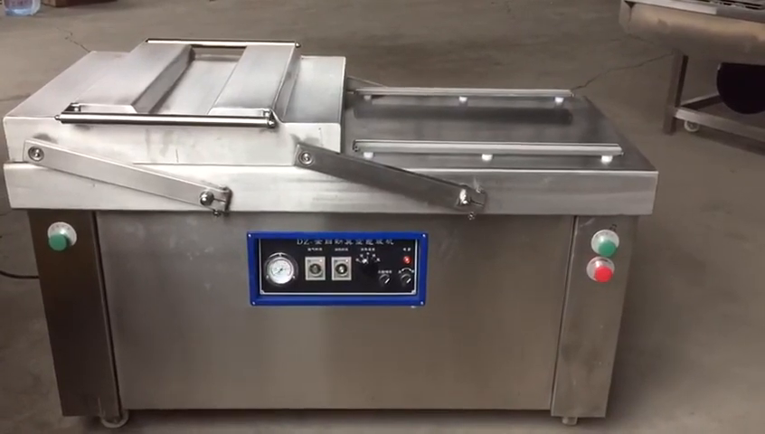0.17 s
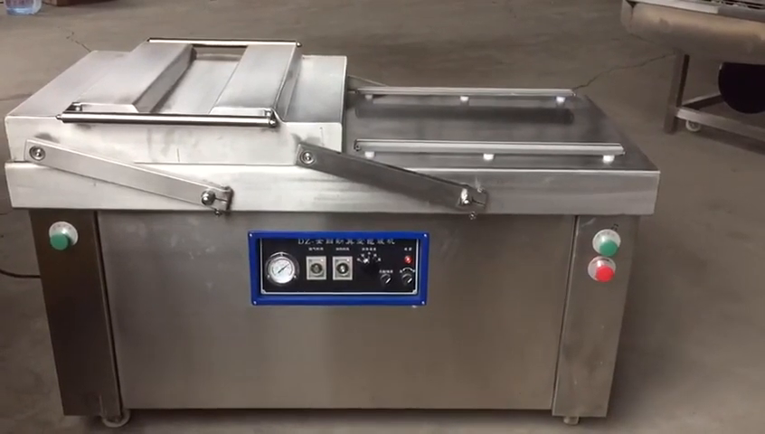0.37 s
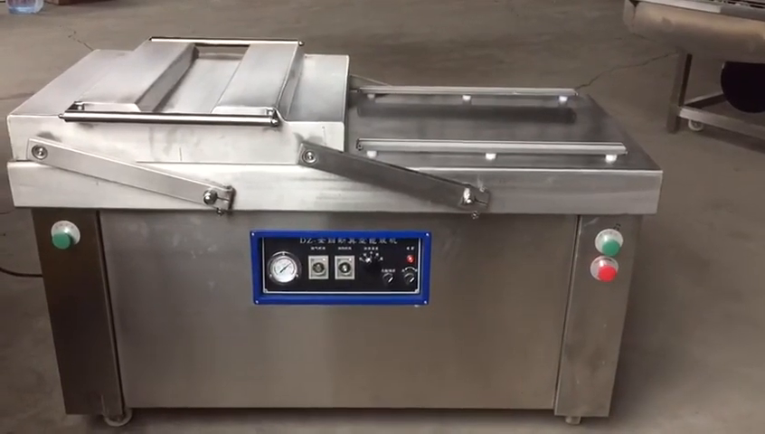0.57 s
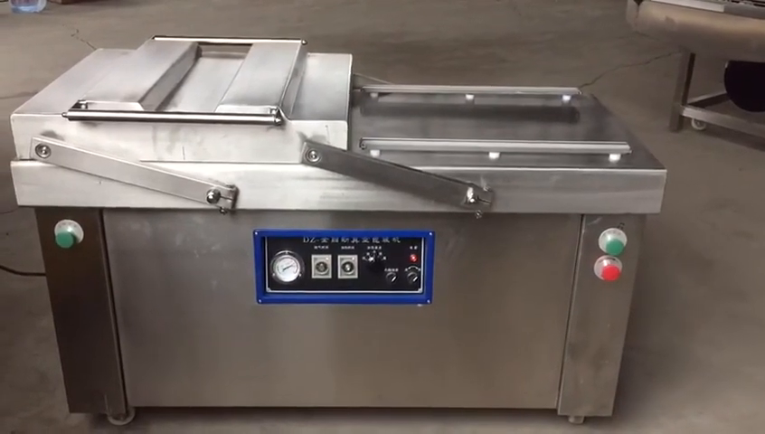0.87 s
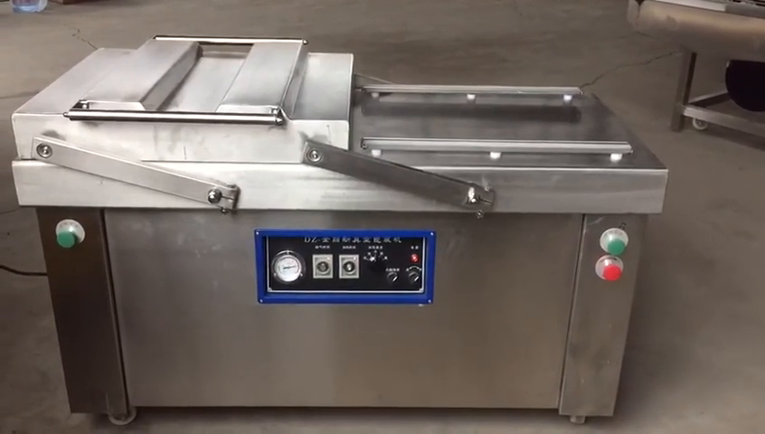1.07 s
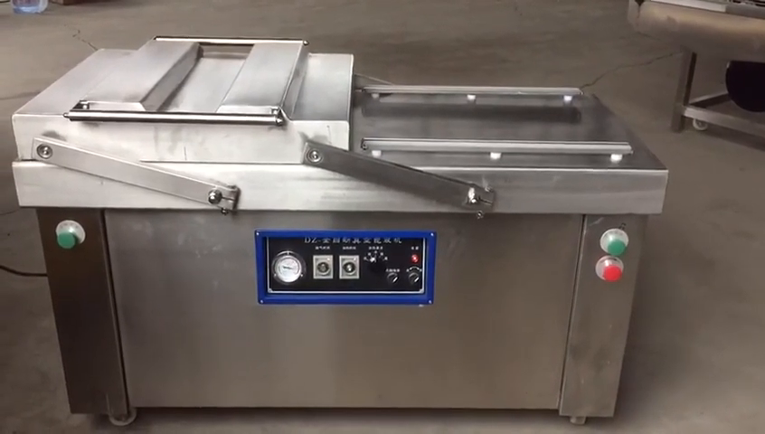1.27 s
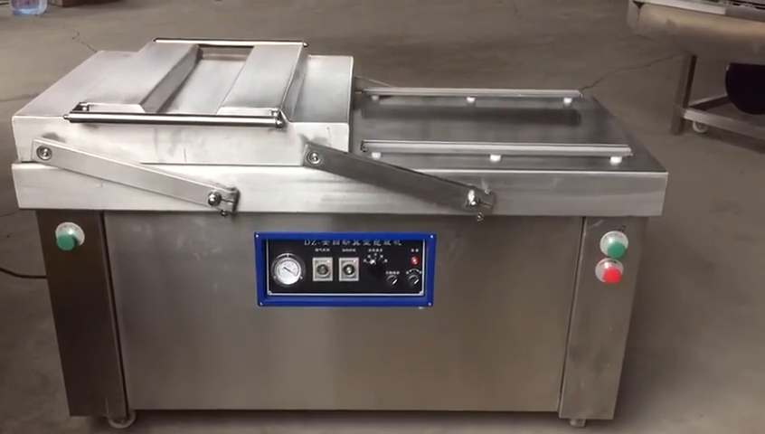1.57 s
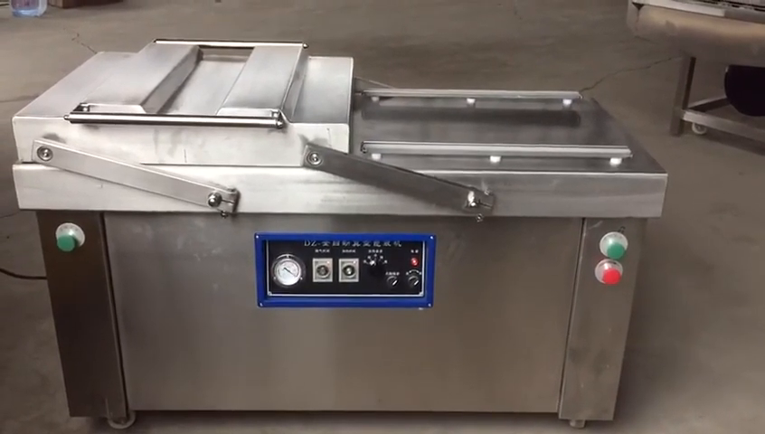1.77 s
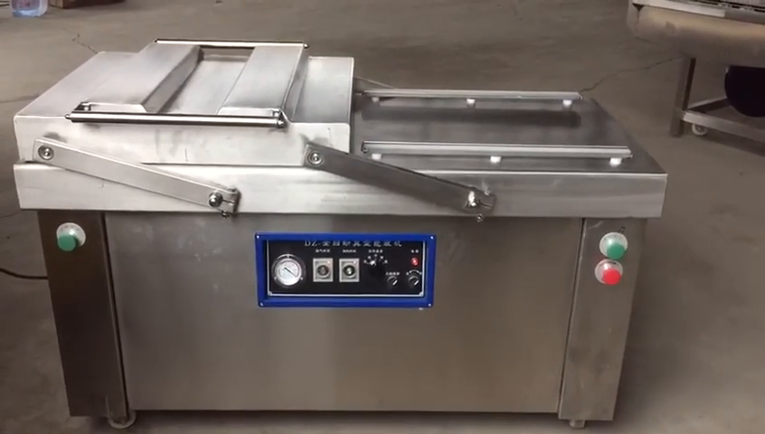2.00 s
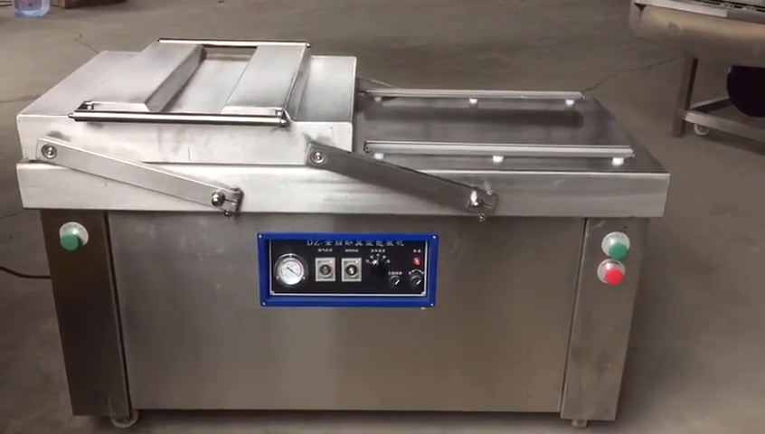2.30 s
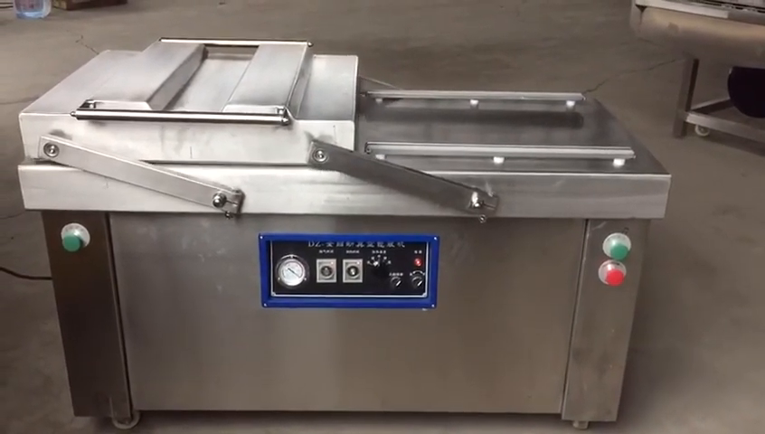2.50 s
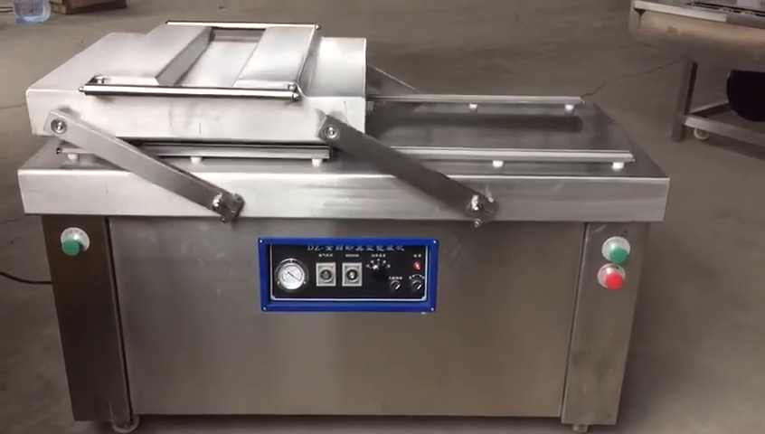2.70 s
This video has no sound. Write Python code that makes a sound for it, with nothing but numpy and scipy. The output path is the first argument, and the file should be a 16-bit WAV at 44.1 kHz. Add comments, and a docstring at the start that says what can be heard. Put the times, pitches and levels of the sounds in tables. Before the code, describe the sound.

Air hisses loudly into a vacuum packing machine over a pump hum, ending with a metallic lid clunk

```python
"""A pump hums steadily in a workshop; then a vent valve ticks and opens with a thump.
A jet hisses through it, joined by a hollow rush and a rumble as air refills a steel vacuum chamber.
The air dulls and fades as the pressure evens out; the lid springs free with a clunk and swings up.
Air and friction are coloured noise under level curves, the hum is wavering sines,
and the metal is decaying modes and bursts of noise."""
import sys
import numpy as np
from scipy import signal
from scipy.fft import rfft, irfft
from scipy.io import wavfile

SR = 44100
rng = np.random.default_rng(int(sys.argv[2]) if len(sys.argv) > 2 else 0)


def transcribe(signal):
    """Save signal, clipped to [-1, 1], as a 16-bit WAV file at the path in sys.argv[1]."""
    frames = np.atleast_2d(signal).T
    limited = np.clip(frames, -1, 1)
    pcm = np.round(limited * 32767).astype(np.int16)
    wavfile.write(sys.argv[1], SR, pcm)


N = 125685

# Spectrum of the jet of air. Each row: frequency in Hz, relative density in dB per Hz.
JET_SPECTRUM = [(30, -29.5), (100, -7), (170, -19), (280, -9), (450, -11.5), (700, -14.5), (1000, -9),
                (1500, -5), (2100, -6.5), (2600, -2.5), (3300, -1.5), (3650, -0.5), (4300, 0.5),
                (4850, -4.5), (5200, -0.5), (6800, 1), (7400, -6), (8500, -3.5), (8750, -4), (9600, -10)]
# Spectrum of the rumble of air in the chamber. Each row: frequency in Hz, relative density in dB per Hz.
RUMBLE_SPECTRUM = [(25, -32), (55, -11), (110, -3), (190, -2.5), (300, -2), (400, -5.5), (520, -7.5),
                   (800, -7.5), (1200, -0.5), (2500, -47.5)]
# Resonances of the lid's linkage. Each row: centre in Hz, lift in dB.
LINKAGE_RESONANCES = [(472, 4.4), (867, 6.1), (4090, 4)]
LINKAGE_WIDTH_HZ = 41
VALVE_S, VALVE_RISE_S = 0.248, 0.003  # air starts to flow, and takes this long to open fully
UNSEAT_S, UNSEAT_RISE_S = 0.2492, 0.0005  # the valve leaves its seat
PANEL_RISE_S = 0.0067
CLUNK_S = 2.4828  # the lid springs free


def from_db(db):
    """Decibels to gain."""
    return 10 ** (np.asarray(db) / 20)


def seconds():
    """Time of every sample."""
    return np.arange(N) / SR


def level(curve):
    """Gain along a curve of (s, dB), straight in dB between points."""
    return from_db(np.interp(seconds(), *np.transpose(curve)))


def onset(start, rise):
    """Straight fade-in from silence to full, then held."""
    return np.clip((seconds() - start) / rise, 0, 1)


def drift(hz):
    """Random wavering with spread 1: noise that weakens smoothly above about the given rate."""
    f = np.fft.rfftfreq(2 * N, 1 / SR)
    spectrum = rfft(rng.standard_normal(2 * N)) / (1 + (f / hz) ** 2)
    slow = irfft(spectrum)[:N]
    return (slow - slow.mean()) / slow.std()


def noise(colour, resonances=(), width=1):
    """Noise of a given colour, lifted at narrow resonances (width in Hz); rms 1."""
    f = np.fft.rfftfreq(N, 1 / SR) + 1e-3  # keeps the logarithm finite
    hz, db = np.transpose(colour)
    gain = from_db(np.interp(np.log(f), np.log(hz), db))
    gain = gain * np.minimum(f / 20, 1)  # fades below 20 Hz
    for centre, lift_db in resonances:
        gain = gain * from_db(lift_db / (1 + (2 * (f - centre) / width) ** 2))
    x = irfft(rfft(rng.standard_normal(N)) * gain, N)
    return x / x.std()


def blow(start, rise, hold, t60):
    """Envelope of a knock: rise, hold and exponential decay by 60 dB in t60."""
    age = seconds() - start
    decay_age = np.maximum(age - rise - hold, 0)
    return np.clip(age / rise, 0, 1) * np.exp(-np.log(1000) * decay_age / t60)


def blows(knocks, rise, t60):
    """Envelope of a run of unrelated knocks (s, dB); their powers add."""
    power = 0
    for start, db in knocks:
        power = power + (from_db(db) * blow(start, rise, 0, t60)) ** 2
    return np.sqrt(power)


def struck(modes, start, rise):
    """Decaying modes (Hz, dB, t60 s), all set ringing from rest by one blow."""
    age = seconds() - start
    ring = np.zeros(N)
    for hz, db, t60 in modes:
        ring += from_db(db) * blow(start, rise, 0, t60) * np.sin(2 * np.pi * hz * age)
    return ring


def workshop(x):
    """Direct sound plus dense reflections from steel and walls, which carve fine peaks and notches above the bass."""
    room_db, room_t60, room_low_hz = -6, 0.25, 1500
    no_bass = signal.butter(2, room_low_hz, "high", fs=SR, output="sos")
    tail = signal.sosfilt(no_bass, rng.standard_normal(N))
    tail = tail * from_db(-60 * seconds() / room_t60)
    tail = tail / np.linalg.norm(tail)
    wet = irfft(rfft(x) * rfft(tail), N)
    return (x + from_db(room_db) * wet) / np.hypot(1, from_db(room_db))


def pump_whirr():
    """The pump's steady broadband noise, coloured by resonances of its housing."""
    # Spectrum of the whirr. Each row: frequency in Hz, relative density in dB per Hz.
    whirr_colour = [(25, -23.5), (60, -15.5), (110, -10), (180, -11), (240, -10.5), (310, -10), (390, -15),
                    (520, -8), (700, -19), (900, -9.5), (1300, -4), (1600, -10.5), (1950, -21), (2600, -20),
                    (3100, -23), (3700, -17), (4300, -25.5), (4900, -32.5), (6000, -29), (9600, -37)]
    # Resonances of the housing. Each row: centre in Hz, lift in dB.
    housing_resonances = [(291, 4.5), (1087, 3), (1320, 8), (3670, 4.5)]
    whirr_db, housing_width_hz = -34.5, 55
    return from_db(whirr_db) * workshop(noise(whirr_colour, housing_resonances, housing_width_hz))


def pump_hum():
    """The pump's tones: sines that each waver in pitch and level on their own."""
    # Tones of the hum. Each row: mean frequency in Hz, rms level in dB before trim and waver.
    hum_tones = [(102, -54.5), (188.4, -45.5), (516.8, -48), (1079, -49), (1104, -48.5), (1152, -55.5),
                 (1308, -45.5), (1373, -51.5), (3505, -64), (3682, -53.5)]
    trim_db, waver_db, wander_hz = -5, 2.5, 3.34
    hum = np.zeros(N)
    for hz, db in hum_tones:
        phase = 2 * np.pi * np.cumsum(hz + wander_hz * drift(11.0)) / SR
        gain = from_db(db + trim_db + waver_db * drift(6.9))
        hum += gain * np.sqrt(2) * np.sin(phase)
    return hum


def valve_tick():
    """The valve armature ticks just before it opens: one short burst of coloured noise."""
    # Spectrum of the tick. Each row: frequency in Hz, relative density in dB per Hz.
    tick_colour = [(300, -4.5), (2000, -26), (2850, -2.5), (3700, -22), (6000, -16), (9600, -26)]
    tick_s, tick_db, tick_t60 = 0.2305, -25, 0.17
    return from_db(tick_db) * blow(tick_s, 0.00084, 0.0032, tick_t60) * noise(tick_colour)


def valve_unseating():
    """A first spit of air, a knock as the valve hits its stop and a longer low boom."""
    spit_db, spit_t60 = -16.5, 0.045
    knock_db, knock_t60 = -19, 0.02
    boom_db, boom_t60 = -29, 0.39
    spit = from_db(spit_db) * blow(UNSEAT_S, UNSEAT_RISE_S, 0, spit_t60) * noise(JET_SPECTRUM)
    knock = from_db(knock_db) * blow(UNSEAT_S, UNSEAT_RISE_S, 0, knock_t60) * noise(RUMBLE_SPECTRUM)
    boom = from_db(boom_db) * blow(UNSEAT_S, PANEL_RISE_S, 0, boom_t60) * noise(RUMBLE_SPECTRUM)
    return spit + knock + boom


def panel_thump():
    """The suction jerks the cabinet panels inward, so their decaying modes start with a negative swing."""
    # Panel modes. Each row: frequency in Hz, level in dB before trim and envelope, t60 in seconds.
    panel_modes = [(62, -24, .07), (88.3, -10.5, 0.13), (101.5, -30.5, 0.98), (113.3, -30, 0.73),
                   (248.4, -21.5, 0.15), (500, -30, 0.11)]
    thump_s, trim_db = 0.249, -1.5
    return -from_db(trim_db) * struck(panel_modes, thump_s, PANEL_RISE_S)


def air_jet():
    """Turbulent hiss through valve and pipe: it starts with a surge, flutters, and its sheen dies first."""
    # Course of the jet. Each row: time in seconds, level in dB before surge, flutter and added sheen.
    jet_level = [(.25, -17.5), (.45, -19.5), (.65, -19), (.85, -18), (1.05, -19.5), (1.3, -21.5),
                 (1.55, -24), (1.8, -30.5), (2.0, -39.5), (2.2, -49.5), (2.45, -73), (2.85, -67)]
    # Valve and pipe resonances. Each row: centre in Hz, lift in dB.
    pipe_resonances = [(2661, 4.5), (3187, 4.5), (3663, 4.5), (5744, 6.5), (5883, 5.5), (6150, 5),
                       (6400, 6), (6590, 6.5), (6705, 5), (6867, 4.5), (7003, 5.5), (7385, 6.5), (7530, 7),
                       (8560, 6)]
    # Spectrum of the brightest hiss. Each row: frequency in Hz, relative density in dB per Hz.
    sheen_colour = [(6000, -32), (7400, 0.5), (8100, -2.5), (9600, -11)]
    pipe_width_hz = 34
    surge_db, surge_s = 3, 0.045  # extra level at the start, and its decay time constant
    flutter_db, flutter_hz = 0.66, 26
    sheen_db, sheen_fall_db_per_s = -6, 12  # relative to the jet; falls as the pressure gap closes
    age = np.maximum(seconds() - VALVE_S, 0)
    sheen = noise(sheen_colour, pipe_resonances, pipe_width_hz)
    sheen = sheen * from_db(sheen_db - sheen_fall_db_per_s * age)
    hiss = workshop(noise(JET_SPECTRUM, pipe_resonances, pipe_width_hz) + sheen)
    unsteadiness = from_db(surge_db * np.exp(-age / surge_s) + flutter_db * drift(flutter_hz))
    return onset(VALVE_S, VALVE_RISE_S) * level(jet_level) * unsteadiness * hiss


def chamber_air():
    """A hollow rush, then an abrupt low roar: noise through chamber resonances, shaken by the same gusts."""
    # Course of the rush. Each row: time in seconds, level in dB before gusts.
    rush_level = [(.25, -37.5), (.82, -32.5), (.85, -29), (1.08, -24.5), (1.3, -23.5), (1.55, -23.5),
                  (1.8, -25.5), (2.0, -27.5), (2.2, -31), (2.47, -35), (2.6, -34.5), (2.85, -69)]
    # Spectrum of the rush. Each row: frequency in Hz, relative density in dB per Hz.
    rush_colour = [(60, -38), (400, -31.5), (560, -11), (720, -30), (900, -5), (1250, 0.5), (1720, -1),
                   (2050, -5), (2600, -4), (3300, -8), (4200, -5.5), (4900, -16.5), (6500, -18.5),
                   (7700, -32), (9600, -41)]
    # Course of the rumble. Each row: time in seconds, level in dB before breakout and gusts.
    rumble_level = [(.83, -30), (.92, -24), (1.1, -25.5), (1.3, -25.5), (1.5, -31.5), (1.8, -35.5),
                    (2.1, -47.5), (2.85, -76)]
    # Chamber resonances. Each row: centre in Hz, lift in dB.
    chamber_resonances = [(271, 8), (928, 7), (1083, 3.5), (1157, 5), (1248, 5), (1432, 4), (1545, 3)]
    chamber_width_hz = 21
    roar_s, roar_rise_s = 0.829, 0.0053
    gust_hz, rush_gust_db, roar_gust_db = 25, 0.3, 1.35
    gust = drift(gust_hz)
    rush = workshop(noise(rush_colour, chamber_resonances, chamber_width_hz))
    rush = rush * level(rush_level) * from_db(rush_gust_db * gust)
    roar = noise(RUMBLE_SPECTRUM, chamber_resonances, chamber_width_hz)
    roar = roar * level(rumble_level) * from_db(roar_gust_db * gust)
    roar = roar * onset(roar_s, roar_rise_s)
    return onset(VALVE_S, VALVE_RISE_S) * (rush + roar)  # nothing flows before the valve opens


def lid_clunk():
    """The seal lets go with a bright crack; metal contacts chatter, the lid's modes ring and the room answers."""
    # Metal contacts. Each row: start in seconds, peak level in dB before chatter.
    clashes = [(2.483, -13), (2.4872, -19), (2.4922, -15), (2.4975, -28), (2.505, -18)]
    # Spectrum of the clunk. Each row: frequency in Hz, relative density in dB per Hz.
    clunk_colour = [(40, -34), (100, 4.5), (200, -22.5), (320, -12), (600, -33), (800, -3.5), (1030, -2.5),
                    (1200, -3), (1370, -7), (1800, -1), (2300, -13), (3000, -7.5), (3600, -17),
                    (4050, -0.5), (4900, -7.5), (5700, -2), (6500, -8), (7200, -9), (7900, -13.5),
                    (9500, -11.5)]
    # Lid modes. Each row: frequency in Hz, level in dB before the envelope, t60 in seconds.
    lid_modes = [(1038, -22.5, 0.093), (1072, -28, 0.56), (1350, -18.5, 0.13), (1410, -26, .25),
                 (1757, -28, 0.24), (3950, -28, 0.28), (4110, -31, 0.6), (4310, -41, .45),
                 (5378, -32, 0.16), (5900, -31, .25)]
    snap_db, snap_t60 = -17, 0.021
    clash_t60, chatter_db, chatter_hz = 0.1, 1, 500
    tail_db, tail_t60 = -28, 0.66
    snap = from_db(snap_db) * blow(CLUNK_S, 0.00021, 0, snap_t60) * noise(JET_SPECTRUM)
    clash = blows(clashes, 0.00037, clash_t60) * workshop(noise(clunk_colour))
    clash = clash * from_db(chatter_db * drift(chatter_hz))
    ring = struck(lid_modes, CLUNK_S, 0.0043)
    room = from_db(tail_db) * blow(CLUNK_S, 0.03, 0, tail_t60) * noise(clunk_colour)
    return snap + clash + ring + room


def linkage_knocks():
    """Loose knocks of the linkage: dull noise bursts lifted at its resonances."""
    # Knocks. Each row: start in seconds, peak level in dB.
    thuds = [(2.529, -23.5), (2.543, -24.5), (2.565, -28.5), (2.708, -33.5)]
    # Spectrum of the knocks. Each row: frequency in Hz, relative density in dB per Hz.
    thud_colour = [(40, -28), (110, 4), (210, -3.5), (340, -3), (480, 3.5), (650, -16), (900, -2),
                   (3000, -15), (9000, -45)]
    thud_rise_s, thud_t60 = 0.0024, 0.18
    body = noise(thud_colour, LINKAGE_RESONANCES, LINKAGE_WIDTH_HZ)
    return blows(thuds, thud_rise_s, thud_t60) * body


def lid_swing():
    """Friction noise: the lid rustles unevenly as it rises, and its arms start to rub on their pivots."""
    # Spectrum of the rustle. Each row: frequency in Hz, relative density in dB per Hz.
    swing_colour = [(30, -15), (100, -4), (280, 4.5), (450, -10.5), (850, -0.5), (1400, -4.5), (2000, -2.5),
                    (3200, -24.5), (4200, -3.5), (5000, -14.5), (6500, -14), (9600, -21.5)]
    # Spectrum of the rub. Each row: frequency in Hz, relative density in dB per Hz.
    rub_colour = [(700, -16), (1200, 7), (1900, 1), (3000, 1.5), (4300, -6), (9600, -33)]
    swing_s, swing_rise_s, swing_db = 2.55, 0.082, -34
    rub_s, rub_rise_s, rub_db = 2.718, 0.005, -37.5
    uneven_db, uneven_hz = 1.2, 45
    rustle = noise(swing_colour, LINKAGE_RESONANCES, LINKAGE_WIDTH_HZ)
    rustle = from_db(swing_db) * onset(swing_s, swing_rise_s) * rustle
    rub = from_db(rub_db) * onset(rub_s, rub_rise_s) * noise(rub_colour)
    return (rustle + rub) * from_db(uneven_db * drift(uneven_hz))


def scene():
    """The whole machine as one channel."""
    pump = pump_whirr() + pump_hum()
    valve = valve_tick() + valve_unseating() + panel_thump()
    air = air_jet() + chamber_air()
    lid = lid_clunk() + linkage_knocks() + lid_swing()
    return (pump + valve + air + lid)[None]


def record(dry):
    """The deep bass is rolled off and the top is cut steeply."""
    low_cut_hz, cutoff_hz = 39, 9730
    low_cut = signal.butter(3, low_cut_hz, "high", fs=SR, output="sos")
    top_cut = signal.ellip(12, 0.1, 70, cutoff_hz, fs=SR, output="sos")
    thin = signal.sosfilt(low_cut, dry)
    return signal.sosfilt(top_cut, thin)


dry = scene()
out = record(dry)
transcribe(out)
```